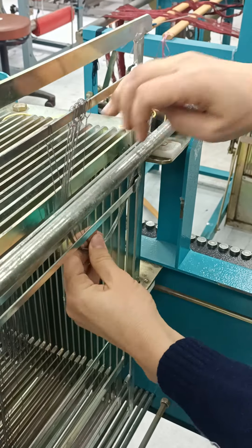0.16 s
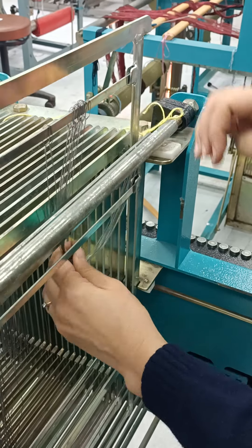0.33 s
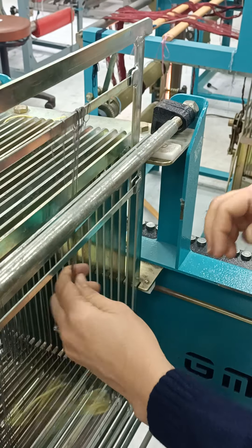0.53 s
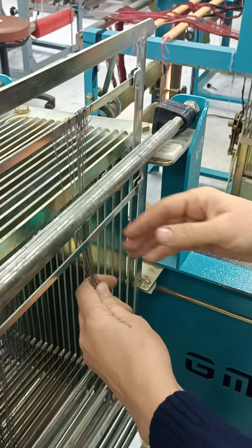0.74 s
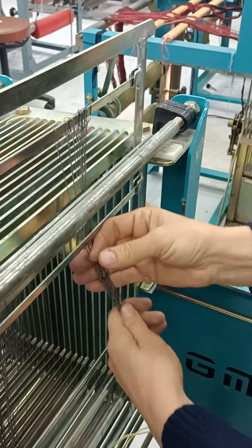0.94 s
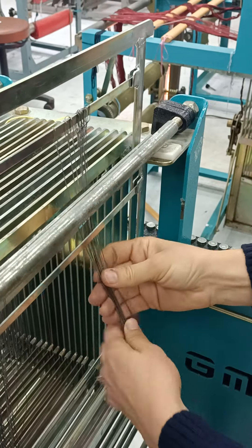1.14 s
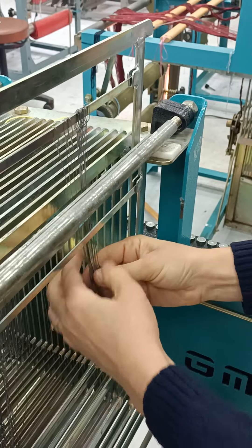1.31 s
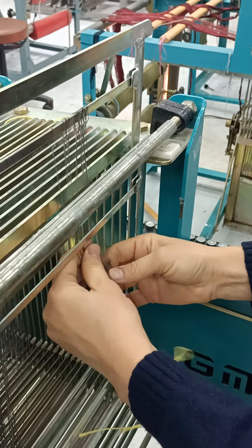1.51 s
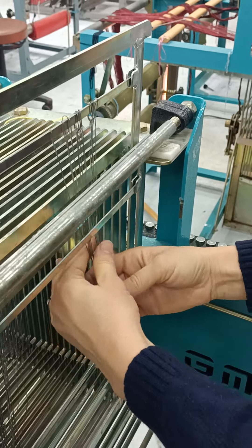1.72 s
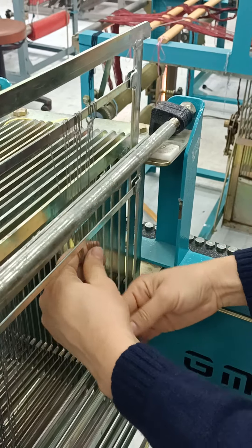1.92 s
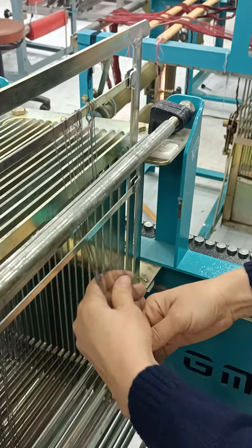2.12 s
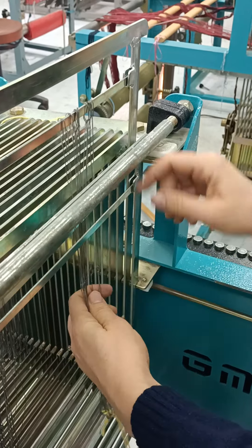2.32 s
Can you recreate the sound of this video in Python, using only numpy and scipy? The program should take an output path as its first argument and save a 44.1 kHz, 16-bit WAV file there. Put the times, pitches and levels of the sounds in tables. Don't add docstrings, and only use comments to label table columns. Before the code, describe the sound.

Thin steel loom wires jingle under fingers, close and left of centre. A loud bright clash at 0.1 seconds rings on, with dull frame thuds and a knock near 0.2; rattling sprays continue from 0.35 to 0.7. A nail-like snap comes at 0.86, knocks at 1.04 and 1.17, a faint distant scrape around 1.4, then light ticks until the end, over airy workshop ambience and faint low hum.

```python
import sys
import numpy as np
from scipy import signal
from scipy.fft import rfft, irfft, next_fast_len
from scipy.io import wavfile

SR = 44100
rng = np.random.default_rng(int(sys.argv[2]) if len(sys.argv) > 2 else 0)


def log_audio(samples):
    frames = np.atleast_2d(samples).T
    limited = np.clip(frames, -1, 1)
    pcm = np.round(limited * 32767).astype(np.int16)
    wavfile.write(sys.argv[1], SR, pcm)


def boost_factor(decibels):
    exponent = np.asarray(decibels, float) / 20
    return 10 ** exponent


N = 108221
TIME = np.arange(N) / SR
RIGHT_OWN = 1.306
LIGHT_FROM_S = 1.25

# (frequency [Hz], level [dB])
AIR_COLOUR = [(80, -4), (200, -1), (480, -8.5), (1000, -18.5), (1700, -14.5), (4000, -14), (14800, -15.5),
              (16000, -37)]
# (frequency [Hz], correlation [-1..1])
AIR_LIKENESS = [(60, 0.9), (240, 0.6), (950, 0.39), (3700, .03), (15000, .02)]
# (time [s], level [dB])
BUSTLE = [(0, 3.7), (.6, 4), (1.2, -0.3), (1.45, 0), (1.8, 1.2), (2.05, -2), (2.2, 0.8), (2.45, 0.3)]
# (frequency [Hz], level [dB], start phase [turns])
HUM_LINES = [(56.1, -64.5, 0.38), (56, -78, 0.55)]
# (time [s], level [dB])
FINGER_PRESSURE = [(0, -44.5), (0.039, -87), (0.104, -35.5), (0.248, -45.5), (0.328, -56), (.5, -46.5),
                   (0.686, -40.5), (.79, -63), (.87, -67), (.96, -64.5), (1.2, -66), (1.398, -78),
                   (1.519, -67.5), (1.72, -63), (1.83, -62), (2.05, -84.5), (2.33, -60.5), (2.45, -71.5)]
# (frequency [Hz], level [dB])
WIRE_COLOUR = [(1500, -15), (3400, -15.5), (3900, -12), (5700, -5), (8000, -7.5), (13200, 0.26),
               (15200, -5), (16200, -23.5)]
# (time [s], peak level [dB], spray length [s], brightness [dB/octave])
TOUCHES = [(.0015, -26.5, .012, 4), (0.1847, -18.5, 0.006, 4), (1.177, -38, .01, -4),
           (1.454, -54, 0.018, 1), (1.604, -47, .02, 4.5), (1.779, -47.5, .01, 1), (0.8086, -34, .014, -15),
           (0.8213, -30.5, .012, -0.5), (0.862, -27, 0.0025, -14), (0.865, -38, 0.011, 4),
           (0.885, -38, 0.024, 1), (1.0363, -19.5, .015, -4), (1.159, -29, .014, -14.5),
           (1.171, -29, .02, -2), (1.193, -35, 0.014, -17), (1.264, -55, 0.022, 12),
           (1.283, -48.5, 0.019, -2), (1.498, -49, 0.028, 0), (1.525, -45.5, 0.017, -0.5),
           (1.582, -41, .008, 8), (1.652, -42, 0.037, 2), (1.689, -38.5, .011, 0), (1.706, -37, 0.043, 4.5),
           (1.753, -42.5, 0.021, 0), (1.796, -43, 0.044, -1.5), (1.904, -54, 0.023, -8),
           (2.116, -46, 0.023, -4), (2.154, -43.5, 0.023, 0), (2.247, -50.5, .02, -3), (2.329, -46, .03, 1)]
# (time [s], peak level [dB], spray length [s], brightness [dB/octave])
PUSHES = [(0.0845, -9.5, 0.015, 3.5), (.1055, -10.5, 0.017, 0), (0.1225, -13, 0.015, -1.5),
          (0.1375, -20.5, .014, -2.5), (0.1305, -20.5, 0.019, -6.5), (.374, -42, 0.017, 7),
          (.419, -48, .016, 7), (.213, -27.5, 0.026, -5.5), (0.236, -35.5, 0.039, -14),
          (0.3435, -23, 0.021, -5.5), (0.3985, -24.5, 0.018, -7.5), (0.4465, -33.5, 0.011, -6),
          (0.478, -23.5, .02, -3.5), (0.5085, -23, 0.018, -5), (0.543, -34, 0.016, -18),
          (0.5666, -22.5, 0.018, 12), (0.579, -21.5, 0.03, -4), (.6145, -19.5, 0.012, 4.5),
          (0.628, -24.5, 0.017, -1.5), (0.661, -20, 0.013, 1), (0.676, -19, 0.023, -1.5),
          (.7645, -38, 0.0059, -3.5)]
# (time [s], peak level [dB], spray
# length [s], brightness [dB/octave])
MORE_KNOCKS = [
    (0.0832, -20, 0.0032, 11),
    (0.85, -41, .014, -12),
    (1.013, -47.5, .02, 12),
    (1.063, -43, .05, -8),
    (1.101, -47.5, .045, -8),
    (1.03, -40, 0.005, 6),
]
# (frequency [Hz], level [dB], T60 [s])
BAR_MODES = [(4140, -16.5, 0.19), (5765, -13, 0.18), (7230, -15, 0.19), (8700, -9.5, 0.092)]
# (time [s], frequency [Hz], level [dB], T60 [s])
PINGS = [(0.0849, 5100, -31.5, 0.092), (0.089, 8700, -21.5, 0.074), (0.086, 10570, -21, 0.11),
         (0.09, 9200, -44.5, .04), (.126, 7770, -31.5, 0.43), (.135, 9200, -48, 0.29),
         (0.11, 9690, -27.5, 0.046), (.811, 968, -50.5, 0.065), (1.034, 3150, -49, 0.15),
         (1.039, 5916, -24, 0.036), (1.04, 6400, -49, 0.2), (1.038, 4510, -34.5, 0.069),
         (1.039, 6200, -36, 0.063), (1.038, 9400, -35, 0.062), (1.038, 9100, -37.5, 0.061),
         (1.038, 4600, -38.5, 0.043), (.8632, 1440, -38.5, 0.0061), (.095, 2250, -42.5, .12),
         (.1, 3050, -42.5, .08), (.512, 4900, -44, .08), (.612, 3400, -43.5, 0.072),
         (.68, 4700, -36, 0.044), (1.53, 4900, -55, 0.065), (1.5, 4500, -55.5, 0.057),
         (2.5, 4500, -60, .06), (2.1, 4800, -62, .08), (1.041, 2120, -47.5, 0.1),
         (1.162, 970, -46.5, 0.054), (1.195, 4800, -43.5, 0.033), (2.15, 2230, -66.5, 0.14)]
# (time [s], level [dB], favoured pitch [Hz])
THUDS = [(.118, -40.5, 576), (0.142, -44, 347), (.194, -36.5, 460), (.236, -36, 1120), (.25, -39, 500),
         (.81, -50.5, 704), (.848, -53.5, 1200), (.5, -52, 704), (.33, -49.5, 1100), (.6, -54, 900),
         (0.369, -49, 256), (.42, -52, 490), (.71, -52.5, 207), (0.762, -56, 440), (0.861, -57, 290),
         (1.04, -52.5, 1300), (1.16, -45, 1530), (1.197, -55, 1900), (1.22, -60, 255)]
# (frequency [Hz], level [dB], T60 [s])
FRAME_MODES = [(165.7, -8, 0.13), (255, -10, 0.082), (304.3, -23.5, 0.23), (475, -15.5, 0.16),
               (556.3, -9.5, 0.079), (792, -11.5, 0.061), (980, -12, 0.046), (1410, 2, 0.021),
               (1591, -11.5, 0.1), (1780, -5.5, 0.05), (2134, -4.5, 0.057), (2364, -6.5, 0.059),
               (3150, -14, 0.151)]
# (time [s], frequency [Hz], level [dB], T60 [s])
BOOMS = [(.125, 573, -45.5, 0.088), (.14, 255, -51, 0.15), (.2, 155, -45, 0.21), (.246, 165, -43, 0.23),
         (.258, 166.6, -41, 0.17), (.248, 500, -44, 0.14), (.3, 309, -53.5, 0.19), (.335, 161, -54, .15),
         (.375, 248, -54, .08), (.83, 230, -56, 0.17), (1.2, 255, -57.5, 0.16)]
# (frequency [Hz], level [dB], T60 [s])
SCRAPE_MODES = [(2230, -4, 0.014), (2940, 3, 0.019), (3270, -3.5, 0.013), (4100, -5, 0.056)]


def rms_one(x):
    return x / np.sqrt(np.mean(x ** 2) + 1e-20)


def at_hz(points, hz):
    table_hz, value = np.transpose(points)
    return np.interp(np.log(hz), np.log(table_hz), value)


def follow(points):
    return boost_factor(np.interp(TIME, *np.transpose(points)))


def filtered(x, order, hz, kind):
    return signal.sosfilt(signal.butter(order, hz, kind, fs=SR, output="sos"), x)


def ring(clicks, hz, t60):
    r, w = boost_factor(-60 / (t60 * SR)), 2 * np.pi * hz / SR
    return signal.lfilter([0, np.sin(w)], [1, -2 * r * np.cos(w), r * r], clicks + 1e-18)


def bar(drive, level_db):
    return sum(boost_factor(level_db + db) * ring(drive, hz, t60) for hz, db, t60 in BAR_MODES)


def lone_rings(rows):
    out = np.zeros(N)
    for s, hz, db, t60 in rows:
        start = int(s * SR)
        if start < N:
            click = np.zeros(N - start)
            click[0] = boost_factor(db)
            out[start:] += ring(click, hz, t60)
    return out


def air():
    out, edges = 0, 70 * 2 ** np.arange(0, 8.1, .5)
    white = rng.standard_normal((2, 2, N))
    for k, (low, high) in enumerate(zip(edges, edges[1:])):
        centre_hz = np.sqrt(low * high)
        mid, side = filtered(white[k % 2], 2, [low, high], "band")
        alike = np.clip(at_hz(AIR_LIKENESS, centre_hz), -1, 1)
        patch = np.interp(np.arange(N), np.linspace(0, N, 30), rng.standard_normal(30))
        stereo = np.sqrt(1 + alike) * mid + np.sqrt(1 - alike) * side * [[1], [-1]]
        out = out + boost_factor(at_hz(AIR_COLOUR, centre_hz) + 1.5 * patch) * stereo
    return boost_factor(-67) * rms_one(out) * follow(BUSTLE)


def machine():
    hum = sum(boost_factor(db + 1) * np.sin(2 * np.pi * (hz * TIME + turns)) for hz, db, turns in HUM_LINES)
    whine = boost_factor(-88) * rms_one(ring(rng.standard_normal(N), 4170, .06))
    rumble = boost_factor(-77) * rms_one(filtered(rng.standard_normal(N), 2, [20, 45], "band"))
    return (hum + whine + rumble) * boost_factor([[1], [-1]])


def rustle(count=22):
    ticks_per_s, spread_db, t60_at_6khz = 8600, 0.5, 0.0035
    sizes = boost_factor(spread_db * np.minimum(rng.exponential(1, N), 5)) * rng.choice([-1, 1], N)
    ticks = sizes * (rng.random(N) < ticks_per_s / SR)
    dealt = rng.integers(0, count, N)
    ports = np.array([np.ones(N), boost_factor(7.6 * RIGHT_OWN * rng.standard_normal(N))])
    out = 0
    for k, hz in enumerate(np.linspace(2200, 15800, count)):
        struck = ticks * (dealt == k) * ports
        out = out + boost_factor(at_hz(WIRE_COLOUR, hz)) * ring(struck, hz, t60_at_6khz * 6000 / hz)
    return follow(FINGER_PRESSURE) * boost_factor(2.5) * rms_one(out)


def clash(db, length, tilt_db, rise, rise_db, count=90, size=60, groups=4):
    wire_t60_s, snap_db, fall_db, wire_spread_db, tick_spread_db = 0.028, -11, 18, 6, 4.5
    t = np.arange(1800) / SR
    hz = 1500 + (np.arange(count)[:, None] + rng.random((count, 1))) * 14300 / count
    tilt = np.clip(tilt_db, -12, 12) * np.log2(np.maximum(hz, 4500) / 9000)
    colour = boost_factor(at_hz(WIRE_COLOUR, hz) + tilt)
    fade = boost_factor(-60 * t / (wire_t60_s * rng.uniform(.4, 1.6, (count, 1))))
    snap = boost_factor(snap_db - 60 * t / .002)
    rings = colour * np.sin(2 * np.pi * hz * t) * (fade + snap)
    place = rng.random((groups, size // groups)) ** 1.2
    place[0, 0] = 0
    out = 0
    for spots in place:
        shared, own = rng.standard_normal((2, count))
        right = (1 + RIGHT_OWN * own) / np.hypot(1, RIGHT_OWN)
        strength = boost_factor(wire_spread_db * shared) * rng.choice([-1, 1], count)
        weights = strength * np.array([np.ones(count), right])
        swell_db = -rise_db * np.clip(1 - spots / rise, 0, 1)
        force = boost_factor(tick_spread_db * rng.standard_normal(len(spots)) - fall_db * spots + swell_db)
        spray = np.zeros(2300)
        np.add.at(spray, (spots * np.clip(length, .001, .05) * SR).astype(int), force)
        out = out + signal.fftconvolve(weights @ rings, spray[None], axes=1)
    return boost_factor(db) * out / np.abs(out[0]).max()


def sprays(rows, rise, rise_db):
    out = np.zeros((2, N + 8192))
    for s, db, length, tilt_db in rows:
        sound, start = clash(db, length, tilt_db, rise, rise_db), int(s * SR)
        out[:, start:start + sound.shape[1]] += sound
    return out[:, :N] + 1e-18


def heddles():
    knocks = sprays([row for row in TOUCHES + MORE_KNOCKS if row[0] < LIGHT_FROM_S], 0.2, 7.5)
    light = sprays([row for row in TOUCHES if row[0] > LIGHT_FROM_S], 0.2, 7.5)
    thin = sprays(PUSHES, 0.26, 15) + light
    thin = filtered(thin, 4, 3650, "high") + boost_factor(-11) * thin
    wires = filtered(thin + knocks, 2, 1800, "high")
    return wires + bar(wires, -47.5)


def workshop(x):
    t60_s, wall_cut_hz = 0.24, 8000
    size = next_fast_len(N + SR)
    turn = np.exp(-2j * np.pi * np.arange(size // 2 + 1) / size)
    dull = np.exp(-2 * np.pi * wall_cut_hz / SR)
    wall = (1 - dull) / (1 - dull * turn)
    out = np.zeros((2, size // 2 + 1), complex)
    for k, lag in enumerate((rng.uniform(.007, .04, 16) * SR).astype(int)):
        delay = np.exp(-2j * np.pi * np.arange(size // 2 + 1) * lag / size)
        loop = boost_factor(-60 * lag / SR / t60_s) * wall * delay
        out[k % 2] += loop / (1 - loop) * (-1) ** (k // 2)
    return irfft(out * rfft(x, size), size)[:, :N]


def pings():
    return lone_rings(PINGS)


def frame(count=6):
    focus_db, length_s = 2, .02
    s, db, centre_hz = np.transpose(THUDS)
    at = ((s[:, None] + length_s * rng.random((len(s), count))) * SR).astype(int)
    luck = rng.standard_normal((len(s), count, len(FRAME_MODES)))
    out = np.zeros(N)
    for k, (hz, level_db, t60) in enumerate(FRAME_MODES):
        blow_db = db + level_db - 6 - focus_db * np.log2(hz / centre_hz) ** 2
        clicks = np.zeros(N)
        clicks[at] = boost_factor(blow_db)[:, None] * luck[:, :, k]
        out += ring(clicks, hz, t60)
    return out + lone_rings(BOOMS)


def nail_snap():
    snap = np.zeros(N)
    snap[int(.8632 * SR)] = boost_factor(-13)
    return filtered(snap + 1e-18, 2, [500, 2600], "band")


def scrape():
    start_s, length_s = 1.345, .22
    white = rng.standard_normal((2, N))
    phase = np.clip((TIME - start_s) / length_s, 0, 1)
    tone = sum(boost_factor(db) * ring(white, hz, t60) for hz, db, t60 in SCRAPE_MODES)
    return boost_factor(-64.5) * rms_one(tone) * np.sin(np.pi * np.sqrt(phase))


def scene():
    right_lag = .00032 * SR
    brush = rustle()
    left, right = brush + bar(brush, -24.5) + heddles() + pings() + nail_snap()
    thuds = frame()
    right = right + (boost_factor(-6) - 1) * signal.lfilter(*signal.butter(1, 4960, "high", fs=SR), right)
    near = boost_factor(4) * left + boost_factor(2) * thuds
    far = np.roll(boost_factor(-2) * right, int(right_lag)) + np.roll(boost_factor(-3) * thuds, int(0.71 * right_lag))
    walls = boost_factor(-12.5) * workshop(left + boost_factor(-6) * thuds)
    return np.array([near, far]) + walls + air() + machine() + scrape()


def top_cut(x):
    return signal.sosfilt(signal.butter(12, 16480, fs=SR, output="sos"), x)


def record(dry):
    mix = signal.sosfilt(signal.cheby2(10, 60, 16900, fs=SR, output="sos"), dry)
    return top_cut(mix)


dry = scene()
out = record(dry)
log_audio(out)
```